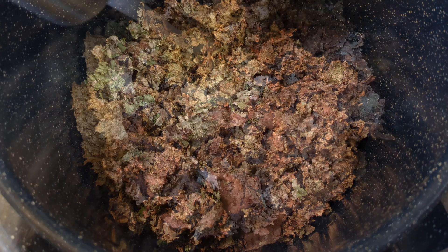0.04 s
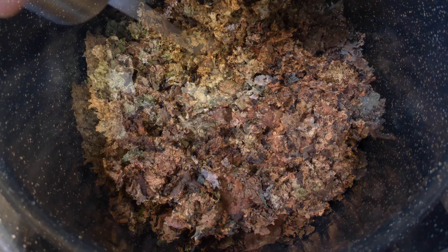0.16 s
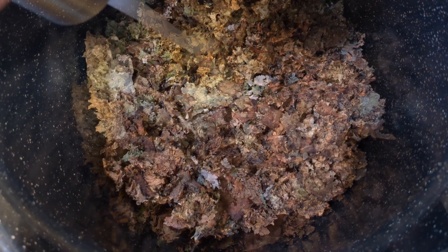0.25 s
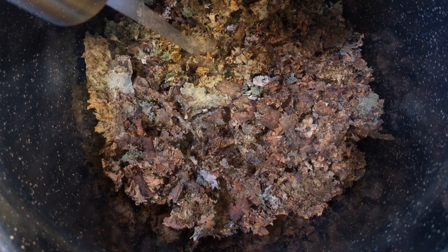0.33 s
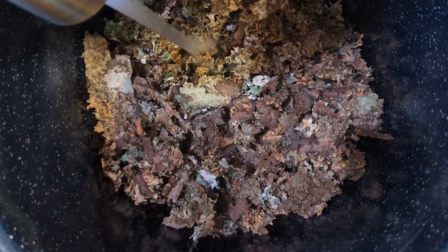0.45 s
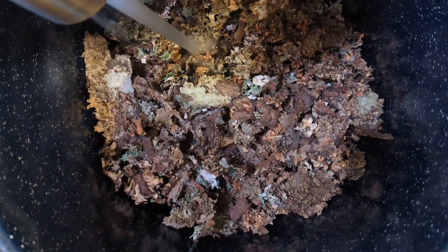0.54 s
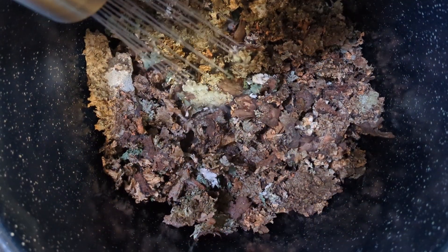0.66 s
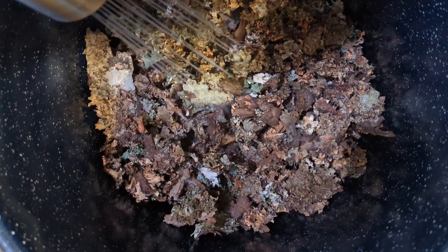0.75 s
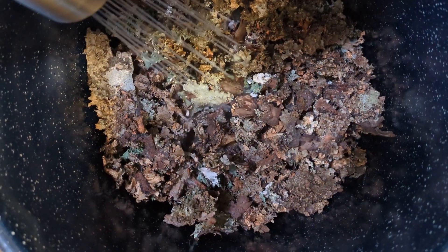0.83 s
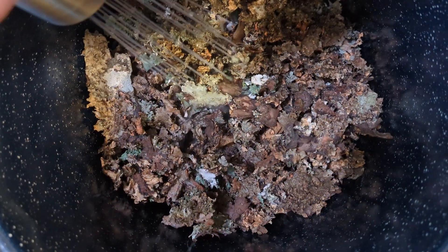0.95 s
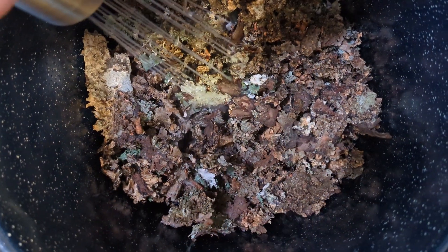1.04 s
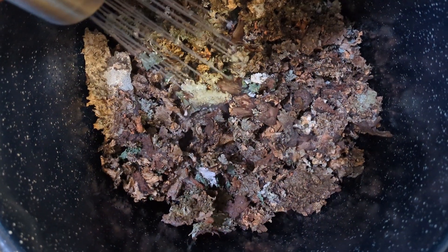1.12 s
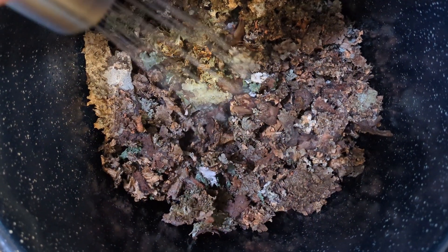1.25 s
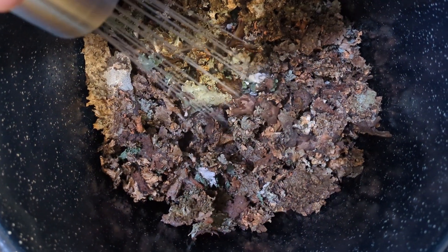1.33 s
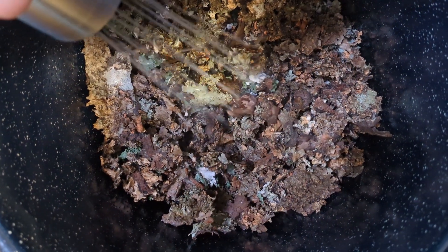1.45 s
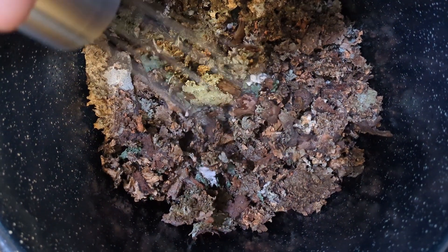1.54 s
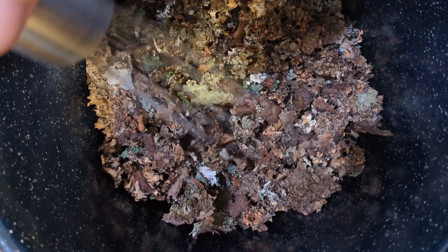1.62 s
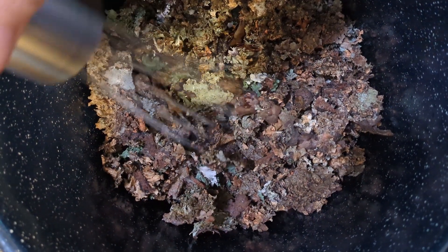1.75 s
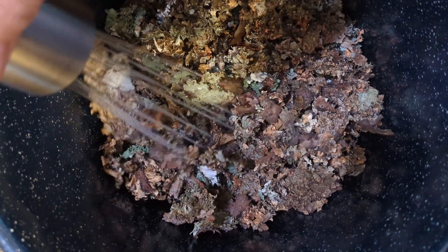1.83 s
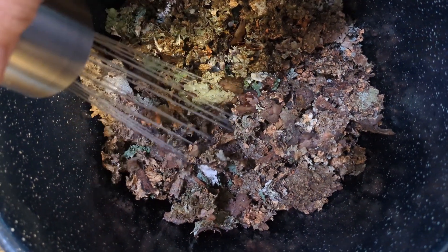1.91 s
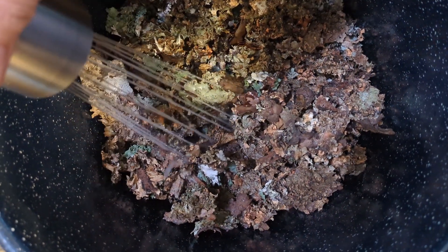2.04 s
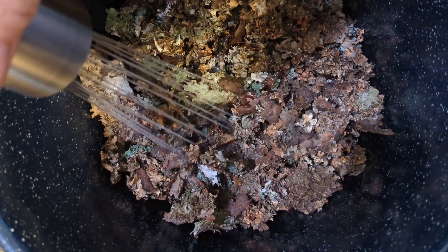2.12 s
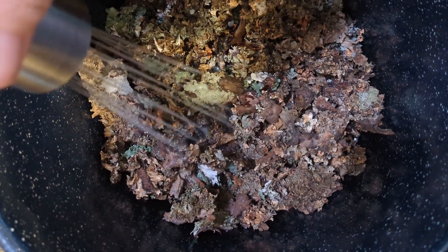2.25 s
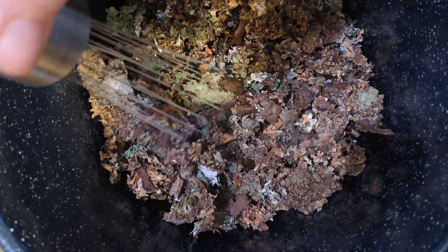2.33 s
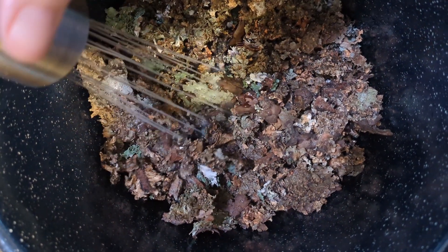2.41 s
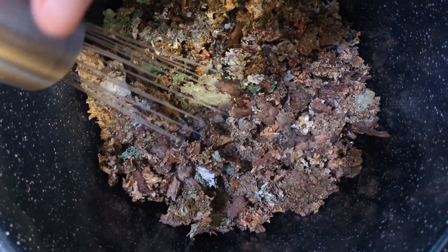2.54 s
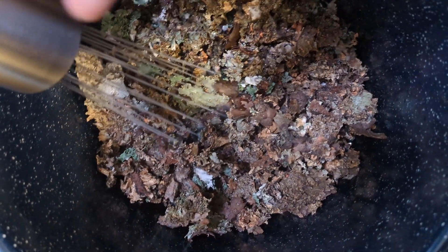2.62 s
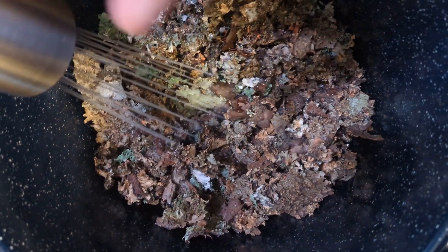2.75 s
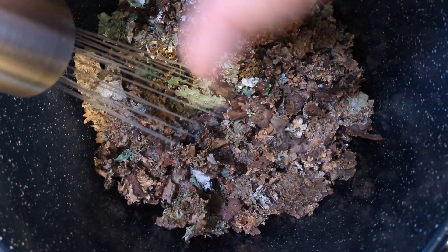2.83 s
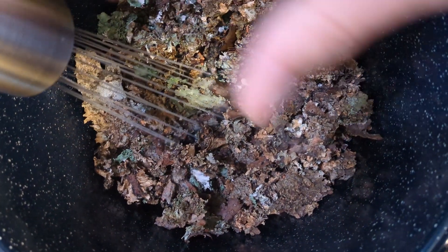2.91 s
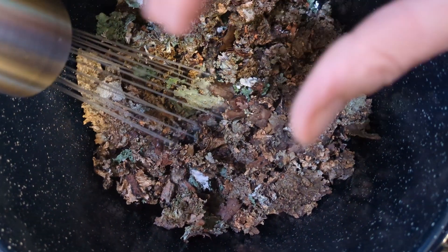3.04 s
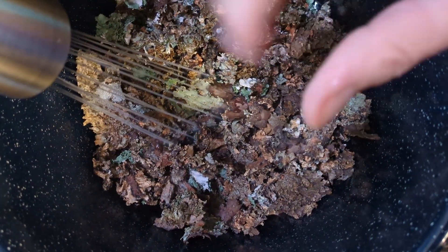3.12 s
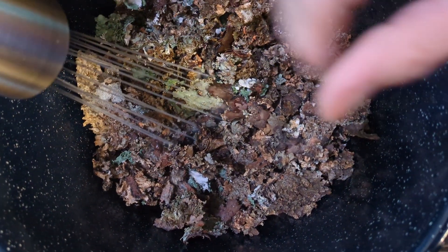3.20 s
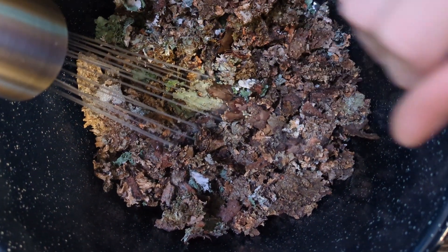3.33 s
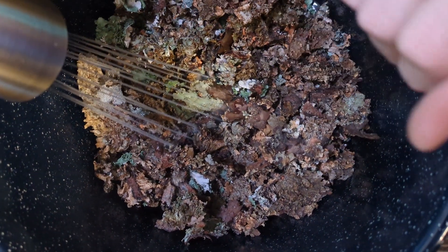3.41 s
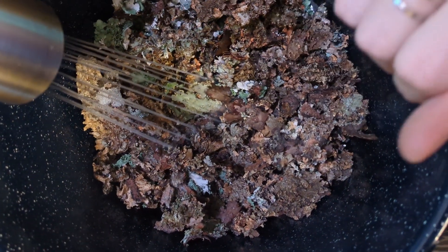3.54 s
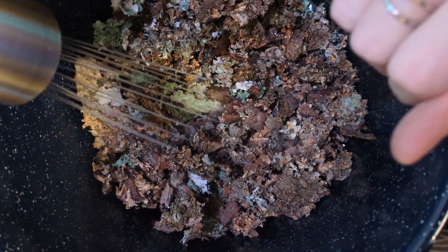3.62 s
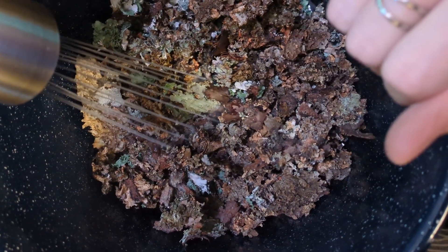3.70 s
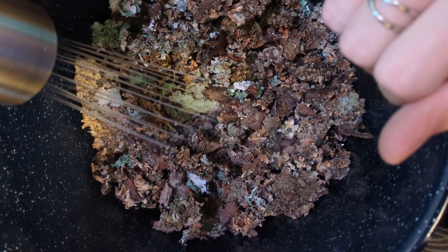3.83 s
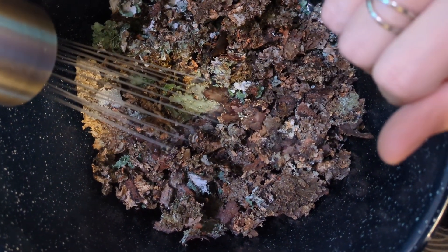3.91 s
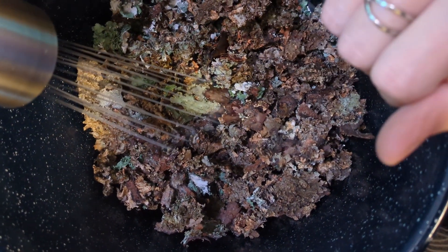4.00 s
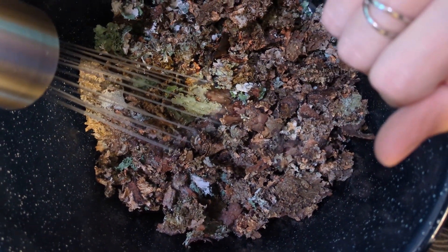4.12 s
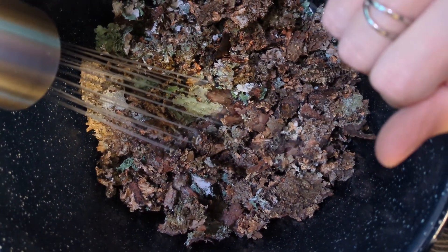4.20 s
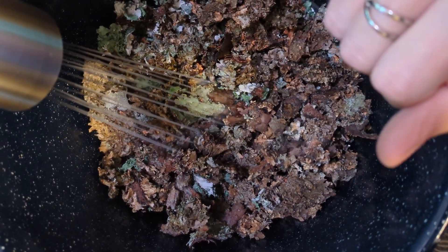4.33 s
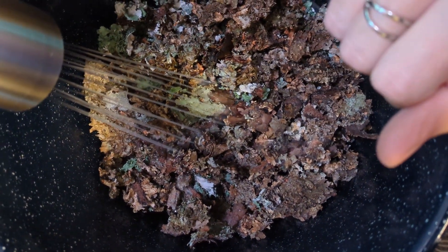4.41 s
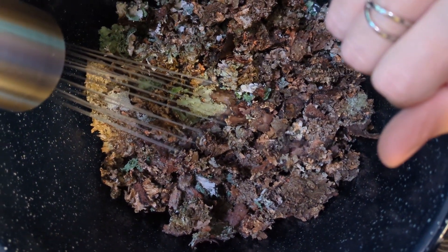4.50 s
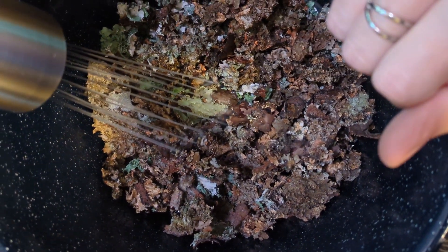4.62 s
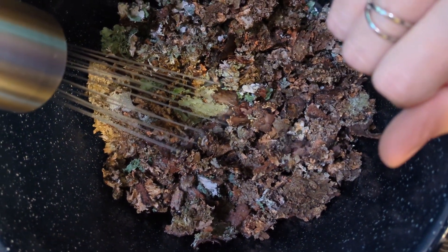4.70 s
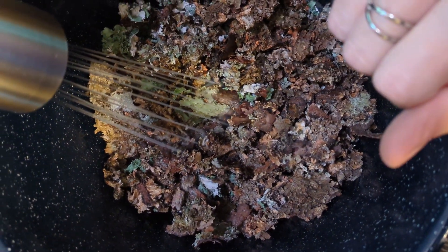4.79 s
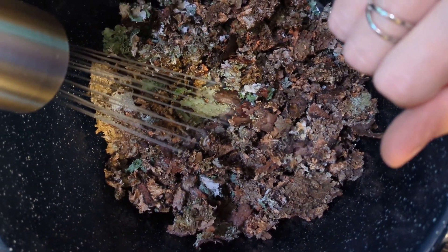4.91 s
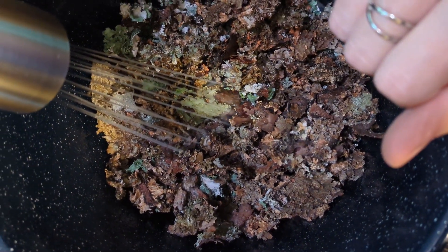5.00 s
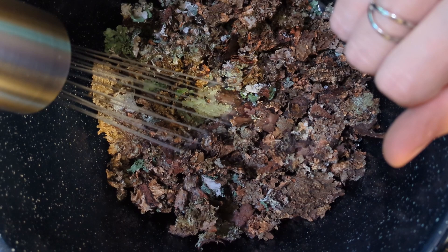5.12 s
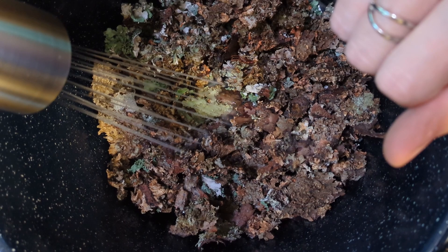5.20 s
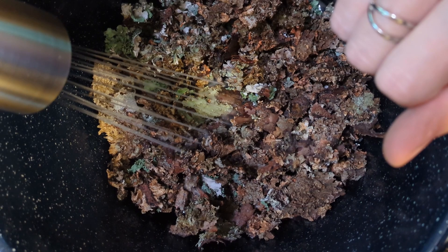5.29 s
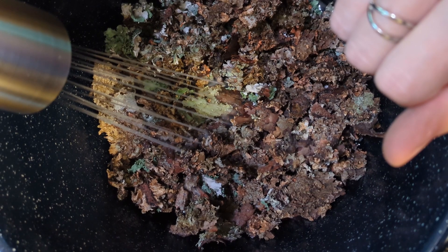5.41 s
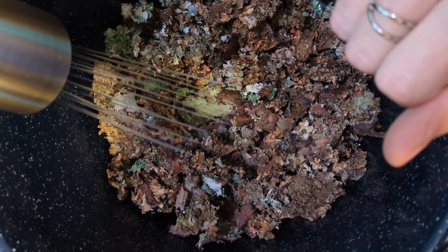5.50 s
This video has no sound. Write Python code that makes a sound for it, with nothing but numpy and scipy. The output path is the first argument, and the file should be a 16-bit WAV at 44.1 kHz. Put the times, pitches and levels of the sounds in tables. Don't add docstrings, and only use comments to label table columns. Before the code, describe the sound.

A brief moment of low kitchen hum cuts abruptly to a foamy tap stream hissing. Around half a second later a rattly clack and small thump switch it to a louder, denser spray, pattering on a crumbly heap and faintly ringing the pot wall. The spray wavers as the head moves, then holds steady to the end. Close stereo microphones above the pot, with a refrigerator droning in a small indoor room.

```python
import sys
import numpy as np
from scipy import signal
from scipy.fft import rfft, irfft, next_fast_len
from scipy.io import wavfile

SR = 44100
rng = np.random.default_rng(int(sys.argv[2]) if len(sys.argv) > 2 else 0)


def makeup_ratio(level_db):
    decades = np.asarray(level_db, float) / 20
    return 10 ** decades


def wav_record(signal):
    frames = np.transpose(np.atleast_2d(signal))
    bounded = np.clip(frames, -1, 1)
    quanta = np.round(bounded * 32767).astype(np.int16)
    wavfile.write(sys.argv[1], SR, quanta)


N = 244774

WATER_ENTERS_S = 0.115
KITCHEN_DB, STREAM_DB, SPRAY_DB = -53.5, -32.4, -26
CAVITY_DB, CAVITY_DB_PER_WET_DB, CAVITY_STREAM_DB = -54, 1, -61.5
WALL_DB, WALL_DB_PER_WET_DB, WALL_REACHED_S, WALL_SHADED_DB = -1.5, 0.21, 1.23, -6.5
SPURT_LENGTH_S = 0.009
HOLLOW_OCTAVES, SWEEP_OCTAVES = 0.062, 0.39

# pitch_hz, level_before_db, level_after_db, phase_before_rad, phase_after_rad
FRIDGE_TONES = [(58.84, -42, -41.5, -1.3, -3.0), (119.96, -50.5, -54.4, 2.5, .2),
                (235.36, -70, -69.5, 0, 0)]
# pitch_hz, level_db per Hz
ROOM_COLOUR = [(25, -22), (60, -4), (105, 1), (145, -7), (185, -13), (250, -5.5), (450, -15.5), (800, -32),
               (2100, -32), (4000, -45), (10000, -50), (13000, -72)]
# start_s, level_db
HAND_BUMPS = [
    (1.49, -50),
    (2.85, -41),
    (2.885, -41),
]
# pitch_hz, level_db, t60_s
BUMP_BODY = [(101.6, -2, .3), (134, -2, 0.33), (162.6, 1.5, 0.21), (205, -9, .15)]
# start_s, level_db
LATCH_CLICKS = [
    (.627, -36),
    (.662, -41),
    (.705, -46),
]
# pitch_hz, level_db, t60_s
LATCH_BODY = [(880, 0, .09), (970, -3, .1), (1850, -3, .03)]
# start_s, level_db
SEAT_CLICKS = [
    (.64, -31),
    (.673, -33),
]
# pitch_hz, level_db, t60_s
SEAT_BODY = [(2200, 3, 0.016), (2800, -8, .015), (3770, 4, 0.018)]
# start_s, level_db
HAMMER_THUMP = [
    (.642, -35),
]
# pitch_hz, level_db, t60_s
THUMP_BODY = [(312, 3, 0.23), (273, -8.5, 0.98), (556, -14, .03)]
# pitch_hz, width_hz, level_db
CAVITY_MODES = [(295.3, 22, 5.5), (349, 39, -1)]
# centre_s, length_s, change_db
STIRS = [
    (.66, 0.058, 2),
    (2.97, .15, 2.5),
    (4.55, 0.17, 3),
    (5.3, 0.25, -3),
]
# pitch_hz, share
SHARED_SOUND = [(300, .95), (550, .7), (1100, .85), (1600, .6), (2500, .4), (4000, .32), (8000, .22),
                (15000, .22)]
# pitch_hz, left_db per Hz, right_db per Hz
STREAM_COLOUR = [(500, -35, -18), (650, -17, -37), (956, -12, -9), (1350, -12.5, -17), (2080, -2, -4),
                 (3400, -7.5, -9.5), (5440, -9.5, -13), (6300, -5, -4), (8400, -2.5, -3), (9700, -4.5, -6),
                 (12000, -6.5, -7), (13200, -6.5, -9), (14100, -12, -13), (15800, -11, -15)]
# pitch_hz, width_hz, level_db
SPOUT_MODES = [(3900, 260, 0.5), (4700, 230, 4), (6300, 360, 0), (7600, 300, -11), (9200, 440, 4.5),
               (10500, 380, 5), (10940, 340, 1), (12600, 500, 1), (13400, 300, -3)]
# pitch_hz, left_db per Hz, right_db per Hz
SPRAY_COLOUR = [(506, -25, -22.5), (648, -23, -20), (970, -8, -9.5), (1500, -7.5, -9.5), (2130, -5.5, -13),
                (2630, -3, -4), (4080, -7, -9.5), (5400, -6, -6), (7440, -2, -3.5), (9500, -1, -4.5),
                (10840, 0.5, -4), (13500, -5, -11.5), (14500, -11, -11.5), (15800, -7.5, -17)]
# pitch_hz, width_hz, level_db
WALL_MODES = [(1460, 61, -8.5), (1693, 41, -1), (1779, 22, 7), (1856, 35, 5), (2102, 44, -3.5),
              (2297, 11, 1), (3690, 490, -10)]
DROP_HZ = [1300, 3300, 6800, 11500]
# time_s, wetness_db where the jets land, nearness_db of the nozzle
HEAD_MOVES = [(.64, -2, -5.5), (.672, -0.5, 6.5), (.8, -1, 2), (1.1, -2.5, 3.5), (1.29, -4, 1.5),
              (1.38, -2, -.5), (1.48, -1, -0.5), (1.72, -3.5, -0.5), (1.82, -2, 2.5), (2.04, -5.5, -1.5),
              (2.26, -5, 1), (2.55, -0.5, 1.5), (2.7, -1, 1), (3.0, -0.5, 0.5), (3.8, 1, 1), (4.3, .5, 0.5),
              (4.9, 0.5, 2), (5.55, .5, 1)]
SIZE_FOLLOWS_WET = [0.46, 1.02, 0.044, 0.057]
SIZE_FOLLOWS_NEAR = [-0.046, 0.012, 0.35, 1.17]
# time_s, splash_left_minus_right_db, fizz_left_minus_right_db
AIM = [(0.6, 1.5, 1.5), (1.22, 3, 5), (1.58, 1.5, 3), (1.9, -1.5, 2), (3.01, 1, 1.5), (3.83, 0, 4),
       (3.99, 1, 4.5), (5.07, 1, 3), (5.55, 2.5, 4)]
# centre_s, change_db
SPURTS = [(.64, -0.5), (.655, -4), (.668, 2), (.706, 1), (.735, 0.5), (1.087, 2), (1.34, 4.5), (1.31, 3.5),
          (1.54, 3.5), (1.675, 1.5), (1.725, -2.5), (1.77, 3.5), (1.8, -3.5), (1.84, 1.5), (1.895, -4),
          (1.915, 4), (1.962, 3), (2.02, 1.5), (2.2, 2), (2.235, -4), (2.404, -1.5), (2.56, 1), (2.81, 3),
          (3.05, 1), (4.41, -1), (5.1, -1.5)]
SPURT_SHARES = [-.4, .8, 0.57, .7]
# centre_s, length_s, pitch_hz, change_db, left_minus_right_db
HOLLOWS = [(0.72, 0.006, 4700, 10, 2), (1.04, 0.19, 9450, -2, -1.5), (1.405, .035, 3300, 6, -4),
           (1.8, .05, 11000, 3, 0), (4.67, 0.033, 1810, 7, 5), (2.532, 0.092, 8300, 3.5, -1),
           (2.913, 0.1, 5100, 7, -6), (3.018, 0.074, 7940, 7.5, -1), (3.6, 0.22, 6300, 0.5, -3.5),
           (3.843, 0.075, 12000, 3.5, 4), (4.003, 0.37, 3570, 5.5, 0), (5.418, 0.03, 1790, 7, 8)]
# centre_s, length_s, pitch_hz, change_db, left_minus_right_db
SWEEPS = [(1.408, 0.05, 4270, 4, -1), (1.4, 0.067, 1210, 5, 0), (1.63, 0.025, 1300, 6.5, 2),
          (1.677, 0.0099, 5700, 7.5, 3), (1.9, 0.09, 1300, 3, 3), (2.148, 0.087, 5030, 3.5, 0),
          (2.401, 0.0092, 5750, 5.5, -10), (5.47, 0.12, 1300, 3, -1)]
# centre_s, length_s, pitch_hz, width_octaves, change_db
HEAD_POSES = [(3.45, 0.92, 13200, .04, 4.5), (0.68, .35, 15400, 0.11, -1.5), (1.4, 0.64, 1860, 0.43, -2.5),
              (0.98, .3, 11650, 0.075, -5.5), (0.53, 0.67, 10250, 0.049, 3)]


def rms_one(x):
    return x / np.sqrt(np.mean(x ** 2) + 1e-20)


def in_time(rows):
    s, *columns = np.transpose(rows)
    return np.array([np.interp(np.arange(N) / SR, s, c) for c in columns])


def at_hz(points, hz, axis=1):
    points = np.array(points)
    return np.interp(np.log(hz), np.log(points[:, 0]), points[:, axis])


def after(s, fade_s):
    return np.clip((np.arange(N) / SR - s) / fade_s, 0, 1)


def bumps(rows):
    t = np.arange(0, N, 100) / SR
    curve = sum(db * np.exp(-.5 * ((t - s) / length) ** 2) for s, length, db in rows)
    return np.repeat(curve, 100)[:N]


def drift(rate):
    r = np.exp(-80 * np.pi * rate / SR)
    noise = rng.standard_normal(N // 40 + 2002)
    slow = signal.lfilter([1], [1, -2 * r, r * r], noise)[2000:]
    return np.interp(np.arange(N) / 40, np.arange(len(slow)), rms_one(slow))


def resonate(x, modes):
    out = 0
    for hz, width_hz, db in modes:
        r = np.exp(-np.pi * width_hz / SR)
        a = [1, -2 * r * np.cos(2 * np.pi * hz / SR), r * r]
        out = out + makeup_ratio(db) * signal.lfilter([(1 - r * r) / 2, 0, (r * r - 1) / 2], a, x)
    return out


def struck(hits, modes, soft_hz):
    at, out = [round(s * SR) for s, db in hits], np.zeros(N)
    for hz, db, t60 in modes:
        clicks = np.full(N, 1e-18)
        clicks[at] = makeup_ratio(np.array(hits)[:, 1] + db + rng.normal(0, 1, len(at)))
        r, w = makeup_ratio(-60 / (t60 * SR)), 2 * np.pi * hz / SR
        out += signal.lfilter([0, np.sin(w)], [1, -2 * r * np.cos(w), r * r], clicks)
    return signal.lfilter(*signal.butter(2, soft_hz, fs=SR), out)


def drops(per_s, spread_db, count):
    sizes = makeup_ratio(spread_db * np.minimum(rng.exponential(1, (count, N)), 5))
    sizes = sizes * rng.standard_normal((count, N))
    return rms_one(sizes * (rng.random((count, N)) < per_s / SR))


def water(colour, motion_db, per_s, spread_db, patchy_db, lag):
    edges = np.r_[np.geomspace(420, 3000, 12), np.geomspace(3000, 16450, 20)[1:]]
    trains = drops(per_s, spread_db, count=6).reshape(2, 3, N)
    trains = trains + makeup_ratio(-12.0) * drops(250, 2.4, count=3)
    out, together = np.zeros((2, N)), drift(20)
    for k, (low, high) in enumerate(zip(edges, edges[1:])):
        band = signal.butter(2, [low, high], "band", fs=SR, output="sos")
        both, *own = signal.sosfilt(band, trains[k % 2])
        hz = np.sqrt(low * high)
        share = np.clip(at_hz(SHARED_SOUND, hz), 0, 1)
        alike = np.array([both, np.roll(both, lag if hz > 2500 else 8)])
        pair = np.sqrt(share) * alike + np.sqrt(1 - share) * np.array(own)
        each_side = np.array([drift(2.9), drift(5)])
        flicker = patchy_db * (.3 * together + 0.93 * each_side + 0.97 * drift(27))
        tone = np.array([[at_hz(colour, hz, axis=1)], [at_hz(colour, hz, axis=2)]])
        out += pair * makeup_ratio(tone + motion_db(hz) + flicker)
    return out


def kitchen():
    size = next_fast_len(N)
    shape = makeup_ratio(at_hz(ROOM_COLOUR, np.arange(1, size // 2 + 2) * SR / size))
    mid, side = irfft(rfft(rng.standard_normal((2, size))) * shape, size)[:, :N]
    return makeup_ratio(KITCHEN_DB) * rms_one(mid + 0.44 * side * np.array([[1], [-1]]))


def refrigerator():
    t = np.arange(N) / SR
    first = t < WATER_ENTERS_S
    hum = 0
    for hz, db, later_db, phase, later_phase in FRIDGE_TONES:
        level = makeup_ratio(np.where(first, db, later_db) + 0.24 * drift(5))
        hum = hum + level * np.cos(2 * np.pi * hz * t + np.where(first, phase, later_phase))
    return np.sqrt(2) * hum * makeup_ratio(np.array([[.3], [-.3]]))


def hand_on_pot():
    return struck(HAND_BUMPS, BUMP_BODY, 220)


def diverter():
    latch = struck(LATCH_CLICKS, LATCH_BODY, 5000)
    seat = struck(SEAT_CLICKS, SEAT_BODY, 8000)
    thump = struck(HAMMER_THUMP, THUMP_BODY, 500)
    return latch + seat + thump


def cavity():
    sprayed = after(.62, .03)
    spray_db = CAVITY_DB + CAVITY_DB_PER_WET_DB * in_time(HEAD_MOVES)[0] + bumps(STIRS)
    level_db = (1 - sprayed) * CAVITY_STREAM_DB + sprayed * spray_db
    air = resonate(drops(3000, 2.0, count=1)[0], CAVITY_MODES)
    return makeup_ratio(level_db + 0.85 * drift(2.7)) * rms_one(air)


def stream():
    foam = water(STREAM_COLOUR, lambda hz: 0, 25000, 0.83, 0.71, lag=9)
    foam = foam + 0.9 * resonate(foam, SPOUT_MODES)
    return makeup_ratio(STREAM_DB) * rms_one(foam) * (1 - after(.625, 0.022))


def swells(hz):
    rows = [(*row, HOLLOW_OCTAVES) for row in HOLLOWS] + [(*row, SWEEP_OCTAVES) for row in SWEEPS]
    rows += [(s, length, centre_hz, db, 0, octaves) for s, length, centre_hz, octaves, db in HEAD_POSES]
    sides = []
    for side in (1, -1):
        changes = []
        for s, length, centre_hz, db, lean_db, octaves in rows:
            near_pitch = np.exp(-.5 * (np.log2(hz / centre_hz) / octaves) ** 2)
            changes.append((s, length, (db + side * lean_db / 2) * near_pitch))
        sides.append(bumps(changes))
    return np.array(sides)


def spray():
    (wet, near), aim = in_time(HEAD_MOVES), in_time(AIM)
    spit = bumps([(s, SPURT_LENGTH_S, db) for s, db in SPURTS])
    sizes = np.outer(SIZE_FOLLOWS_WET, wet) + np.outer(SIZE_FOLLOWS_NEAR, near)
    sizes = sizes + np.outer(SPURT_SHARES, spit)
    aim -= aim[:, N // 2:].mean(axis=1, keepdims=True)

    def motion_db(hz):
        place = np.interp(np.log(hz), np.log(DROP_HZ), np.arange(4))
        level = np.clip(1 - abs(place - np.arange(4)), 0, 1) @ sizes
        lean = aim[int(hz > 4000)] / 2 * np.array([[1], [-1]])
        return level + lean + swells(hz)

    jets = water(SPRAY_COLOUR, motion_db, 16000, 2.28, 0.79, lag=11)
    jets = jets / np.sqrt(np.mean(jets[:, N // 2:] ** 2))
    wall_db = WALL_DB + WALL_DB_PER_WET_DB * wet + WALL_SHADED_DB * (1 - after(WALL_REACHED_S, .15))
    wall_side_db = np.array([[2.5], [-3.5]])
    ring = makeup_ratio(wall_db + 1.0 * drift(10) + wall_side_db) * resonate(jets, WALL_MODES)
    return makeup_ratio(SPRAY_DB) * after(0.625, 0.017) * (jets + ring)


def scene():
    running = (stream() + spray() + cavity()) * after(WATER_ENTERS_S, 0.0017)
    return running + diverter() + hand_on_pot() + refrigerator() + kitchen()


def low_pass(x):
    return signal.sosfilt(signal.butter(12, 15745, fs=SR, output="sos"), x)


def record(dry):
    top_cut = signal.cheby1(8, .3, 15900, fs=SR, output="sos")
    mix = signal.sosfilt(top_cut, dry)
    return low_pass(mix)


dry = scene()
out = record(dry)
wav_record(out)
```